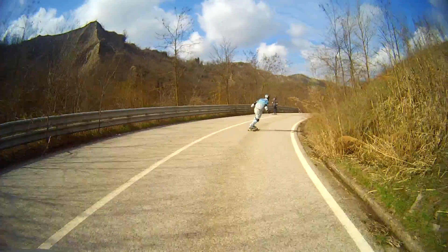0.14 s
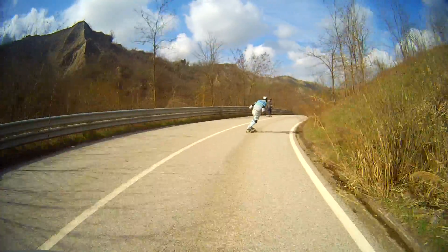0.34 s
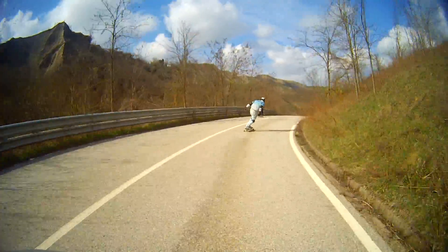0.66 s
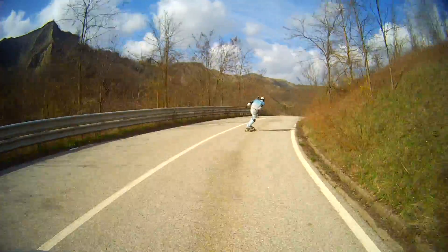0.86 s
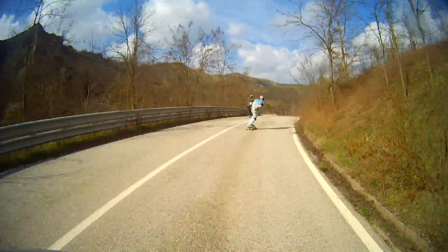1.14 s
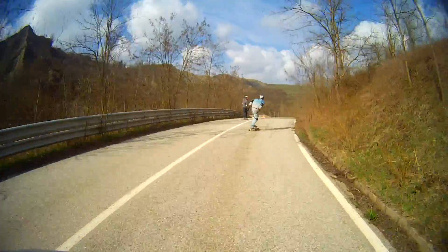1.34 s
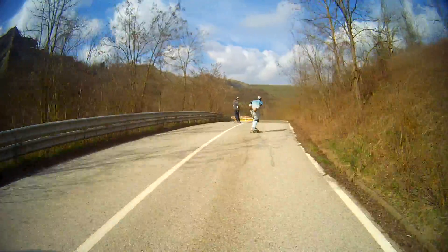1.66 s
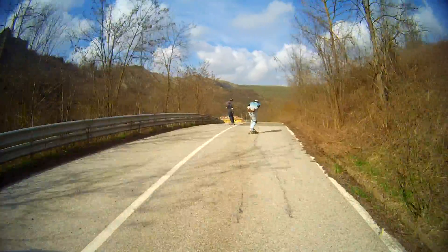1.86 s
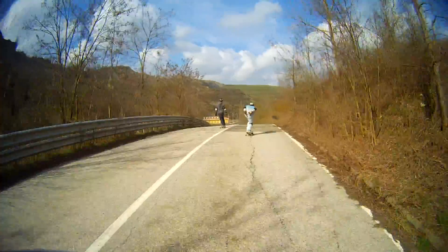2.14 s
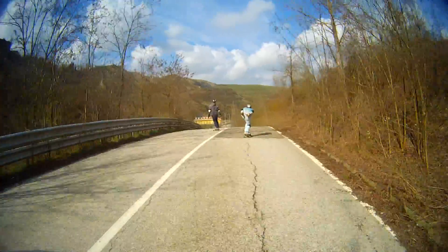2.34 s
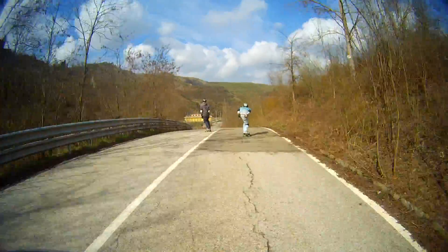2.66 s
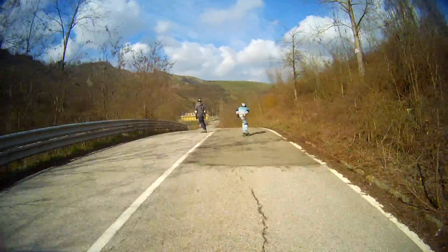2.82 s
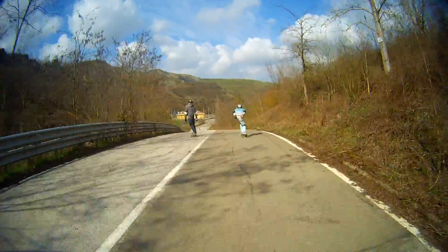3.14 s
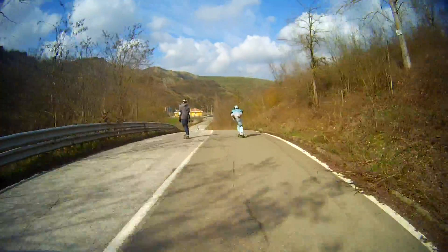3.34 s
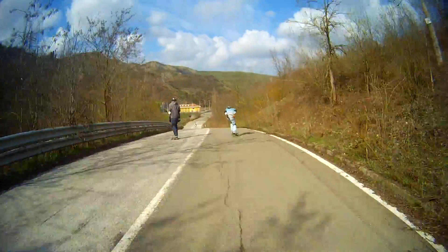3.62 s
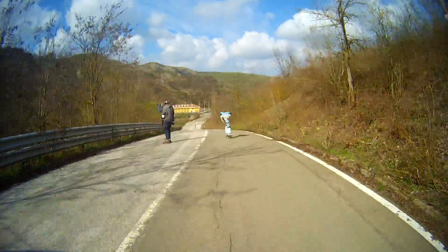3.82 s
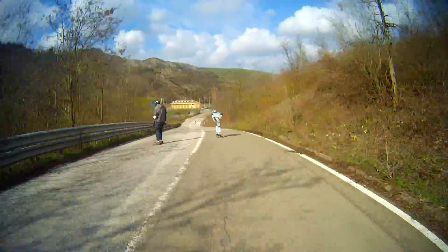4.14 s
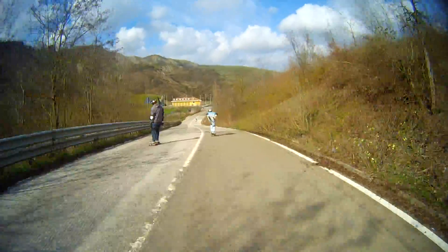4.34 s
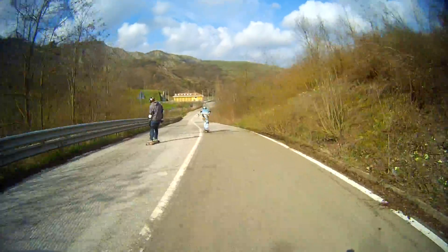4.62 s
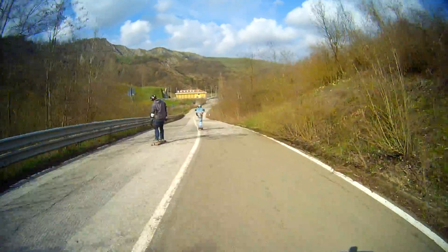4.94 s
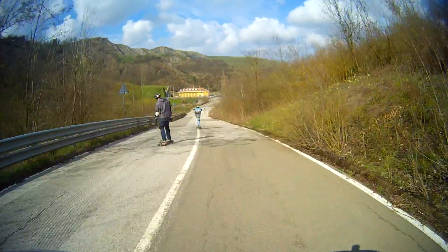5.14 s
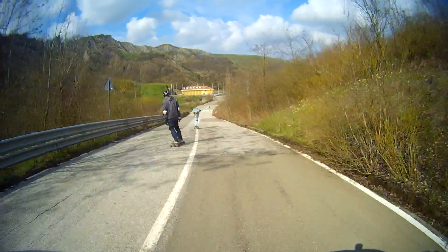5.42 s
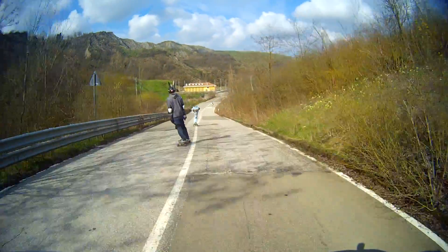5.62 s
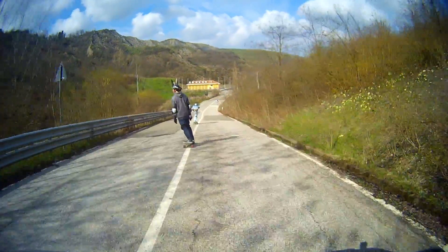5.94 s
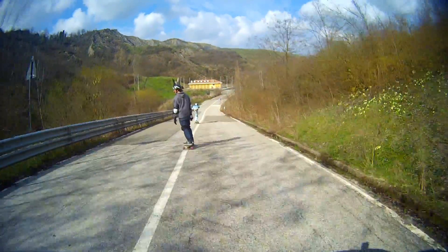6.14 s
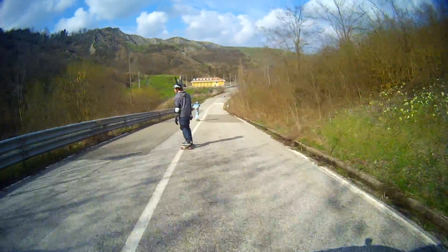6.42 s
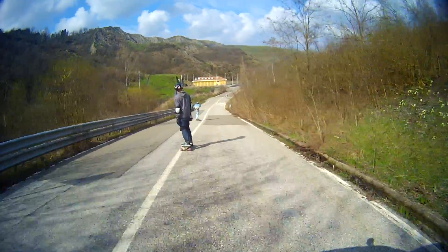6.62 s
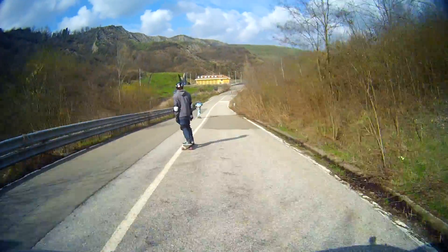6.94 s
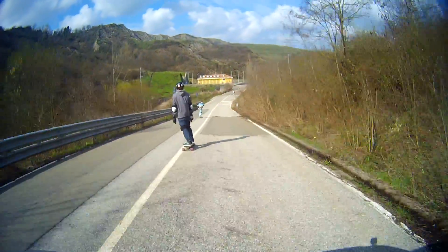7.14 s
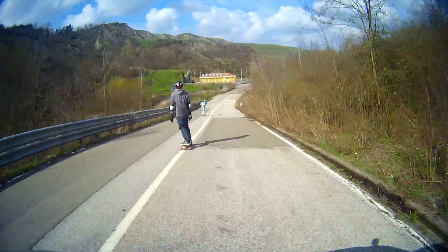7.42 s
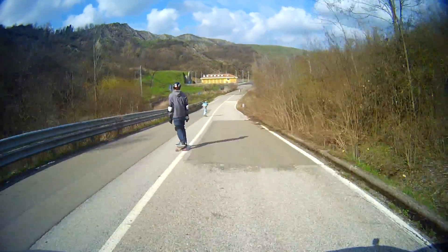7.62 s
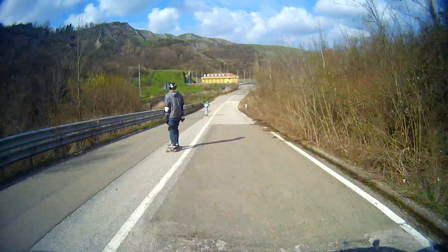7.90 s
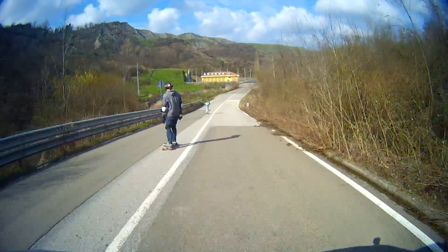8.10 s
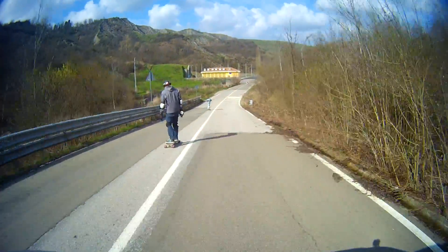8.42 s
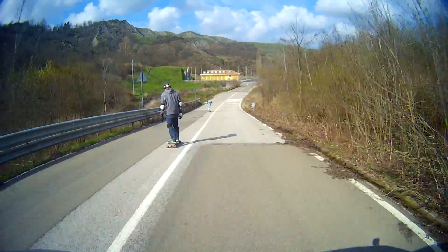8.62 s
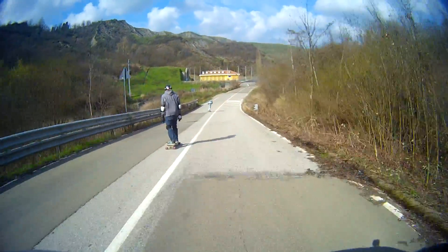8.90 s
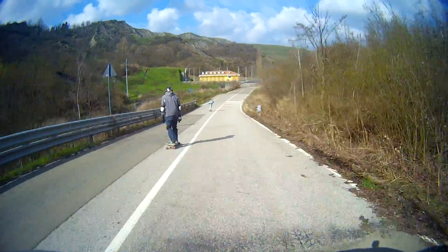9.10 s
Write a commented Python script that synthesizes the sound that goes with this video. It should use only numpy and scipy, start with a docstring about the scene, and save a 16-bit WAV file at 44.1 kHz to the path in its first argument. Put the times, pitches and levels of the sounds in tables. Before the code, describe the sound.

From a car following two longboarders downhill: deep tyre boom, coarse wheel roar, gusty airstream hiss, dull bumps and one small stone clack.

```python
"""A camera on a car follows two longboarders down a mountain road of patched asphalt.
Throughout, road-shaken body and tyres (noise-driven modes, drifting sines) boom under roaring wheels (noise).
From the start the airstream (bursty shaped noise) flutters in the camera's housing, strongest before 2.3 s;
gusts spit treble until 4.4 s. Bumps (damped sines) come from 0.5 s to 3.5 s and from 6.3 s to 8.6 s.
Grit ticks at 1.0 s and 2.1 s; a stone clacks at 2.4 s (noise cracks, short rings)."""
import sys
import numpy as np
from scipy.fft import rfft, irfft, next_fast_len
from scipy.io import wavfile
from scipy.ndimage import uniform_filter1d, map_coordinates

SR = 44100
rng = np.random.default_rng(int(sys.argv[2]) if len(sys.argv) > 2 else 0)


def materialize(psi):
    """Save the field psi as 16-bit PCM at rate SR to the path in sys.argv[1].

    A 1-D psi becomes a single channel; in a 2-D psi each row is a channel.
    """
    bounded = np.clip(np.atleast_2d(psi).T, -1, 1)
    quanta = np.round(bounded * 32767).astype(np.int16)
    wavfile.write(sys.argv[1], SR, quanta)


N = 408366


def amp(db):
    """Amplitude ratio from dB."""
    return 10 ** (np.asarray(db) / 20)


def unit(x):
    """x scaled to rms 1."""
    return x / np.sqrt(np.mean(x ** 2) + 1e-20)


def along(points, hz):
    """(f/Hz, value) points interpolated on a log frequency axis."""
    f, v = np.transpose(points)
    return np.interp(np.log(hz + 1), np.log(f + 1), v)


def curves(rows):
    """One value per sample for each column after the time."""
    s, *cols = np.transpose(rows)
    return [np.interp(np.arange(N) / SR, s, c) for c in cols]


def wobble(rate_hz):
    """A smooth random curve, rate_hz knots a second."""
    knots = rng.standard_normal(int(N * rate_hz / SR) + 4)
    return map_coordinates(knots, [np.arange(N) * rate_hz / SR])


def swells(rows):
    """A curve in dB with one smooth rise and fall for each row."""
    t = np.arange(N) / SR
    return sum(db * np.cos(np.pi * np.clip((t - s) / length_s, -.5, .5)) ** 2 for s, length_s, db in rows)


def follow(control_db, law):
    """Layer level in dB driven by a control; law: mean offset/dB, slope/(dB per dB)."""
    offset_db, slope = law
    mean_db = control_db.mean()
    return mean_db + offset_db + slope * (control_db - mean_db)


def filtered(x, response):
    """x times a complex response of frequency."""
    m = next_fast_len(N + SR // 2)
    return irfft(rfft(x, m) * response(np.fft.rfftfreq(m, 1 / SR)), m)[..., :N]


def resonance(f, hz, width_hz):
    """A causal resonance with gain 1 at its centre."""
    return 1j * f * width_hz / (hz * hz - f * f + 1j * f * width_hz)


def shaken(modes):
    """Steep-sided modes driven by a random force, rms 1."""
    def gain(f):
        power = sum(amp(db) ** 2 * abs(resonance(f, hz, 2 * half_width_hz)) ** 8
                    for hz, half_width_hz, db in modes)
        return np.sqrt(power)
    return unit(filtered(rng.standard_normal(N), gain))


def wavering(tones, sway_db):
    """Separate hums, each drifting in pitch and loudness on its own, rms 1."""
    total = np.zeros(N)
    for hz, drift_hz, db in tones:
        level = amp(db + sway_db * wobble(11))
        phase = 2 * np.pi * np.cumsum(hz + drift_hz * wobble(24)) / SR
        total += level * np.sin(phase)
    return unit(total)


def steady(x, span_s):
    """The same vibration with its swells longer than span_s evened out, rms 1."""
    power = np.abs(uniform_filter1d(x * x, max(int(span_s * SR), 1)))
    smooth_power = np.abs(uniform_filter1d(power, SR // 25))
    return unit(x / np.sqrt(smooth_power + 1e-3))


# road shaking the tyres: t/s, control/dB
SHAKE = [(0.0, -38), (0.41, -40.5), (0.55, -38), (0.8, -40.5), (1.3, -41), (2.45, -41), (2.56, -48),
         (2.63, -38.5), (2.78, -48.5), (2.9, -43), (3.44, -43.5), (3.55, -47), (3.7, -44), (4.0, -51.5),
         (4.2, -49), (4.43, -55), (4.55, -48.5), (5.21, -42.5), (5.58, -50.5), (5.8, -43), (6.2, -44.5),
         (6.36, -41), (7.2, -39.5), (8.3, -41), (8.39, -36), (8.51, -46), (8.6, -43), (9.26, -46.5)]
# tyre modes: f/Hz, half-width/Hz, relative level/dB
TYRE = [(88.8, 11.6, -2.5), (101.2, 9, 1), (118.9, 24, 0), (127, 19, -12.5), (150, 20.7, -10),
        (188, 30, -28.5)]
# tyre hums: f/Hz, drift scale/Hz, relative level/dB
HUM = [(158.9, 4.97, 1), (177, 3.02, -1), (192.8, 2.9, -4)]
# laws on the shaking: mean offset/dB, slope/(dB per dB)
RUMBLE_LAW = (-0.068, 0.96)
HUM_LAW = (-14, 0.55)


def tyres():
    """Road shaking drives the tyres' noise-excited modes and drifting hums."""
    shake_db, = curves(SHAKE)
    rumble = amp(follow(shake_db, RUMBLE_LAW)) * steady(shaken(TYRE), span_s=0.17)
    hum = amp(follow(shake_db, HUM_LAW)) * wavering(HUM, sway_db=4.0)
    return rumble + hum


# car body boom: t/s, control/dB, pitch f/Hz
HEAVE = [(0.0, -43, 50), (0.2, -39.5, 55), (0.54, -52, 55), (0.85, -40.5, 55.6), (1.08, -48.5, 55.8),
         (1.3, -45, 56), (1.75, -42.5, 55.9), (1.88, -48.5, 54), (2.03, -37.5, 53.5), (2.18, -47, 55.5),
         (2.42, -42.5, 56.5), (2.62, -55, 53), (2.95, -45, 52), (3.35, -47, 55.5), (3.52, -41.5, 56.5),
         (3.63, -46.5, 55.5), (3.75, -41, 55), (4.05, -51, 55.5), (4.56, -54.5, 56), (4.95, -52.5, 51),
         (5.12, -43, 55.5), (5.38, -47, 56), (5.55, -55, 52), (5.9, -49, 56), (6.45, -46.5, 55),
         (6.78, -48.5, 52), (6.9, -42.5, 52), (7.03, -46, 52), (7.16, -40, 52), (7.75, -49, 55),
         (7.92, -44, 55), (8.2, -50, 52), (8.35, -43.5, 55.5), (8.48, -47, 55.4), (8.64, -37.5, 55.4),
         (9.0, -47.5, 55.55), (9.26, -50, 50)]
# looser body modes: f/Hz, half-width/Hz, relative level/dB
BODY = [(30, 14, -17), (44.6, 9.5, -1), (55.9, 8.1, 1.5)]
# law on the heaving: mean offset/dB, slope/(dB per dB)
BOOM_LAW = (-0.14, 1)


def boom(drift_hz, sway_db):
    """Waves in the road boom the car's body on one narrow note, over looser modes."""
    heave_db, hz = curves(HEAVE)
    note = np.sin(2 * np.pi * np.cumsum(hz + drift_hz * wobble(14)) / SR)
    body = unit(unit(note) + amp(sway_db) * shaken(BODY))
    return amp(follow(heave_db, BOOM_LAW)) * steady(body, span_s=0.25)


# bumps in the road: t/s, level/dB, bounce f/Hz
BUMPS = [(0.515, -29, 105), (0.836, -29.5, 95.5), (1.998, -30, 104), (2.895, -29.5, 108),
         (3.455, -23, 113.7), (6.33, -25, 113.8), (6.686, -26, 112.5), (7.661, -26, 105), (8.372, -24, 93),
         (8.62, -25, 103.3)]


def bumps(t60_s, attack_s):
    """Each bump sets the tyres bouncing: a damped sine with a soft attack."""
    out, t = np.zeros(N + SR), np.arange(SR // 2) / SR
    envelope = amp(-60 * t / t60_s) * (1 - np.exp(-t / attack_s)) ** 2
    for s, db, hz in BUMPS:
        out[round(s * SR):][:len(t)] -= amp(db) * envelope * np.sin(2 * np.pi * hz * t)
    return out[:N]


# air ring inside the tyres: t/s, control/dB
RING = [(0.0, -49.5), (0.15, -49), (0.7, -55), (1.4, -54.5), (2.05, -53), (2.6, -62), (2.9, -57.5),
        (3.12, -65.5), (3.38, -57.5), (3.58, -68.5), (4.0, -64.5), (4.45, -72), (4.9, -64.5), (6.2, -61),
        (7.45, -58), (8.6, -66), (9.0, -61.5), (9.26, -63.5)]
# cavity notes: f/Hz, drift scale/Hz, relative level/dB
CAVITY = [(226.6, 6.13, -10), (245.4, 2.78, -2), (261.4, 3.31, -6)]
# loose murmur: f/Hz, half-width/Hz, relative level/dB
MURMUR = [(163, 30, 4), (190, 28, -2), (224, 29, 0.5)]
# law on the ring control: mean offset/dB, slope/(dB per dB)
RING_LAW = (-0.8, 1.03)


def tyre_cavity(murmur_db):
    """Air inside the tyres rings on drifting notes over a loose noise-driven murmur."""
    ring_db, = curves(RING)
    cavity = wavering(CAVITY, sway_db=3.5) + amp(murmur_db) * shaken(MURMUR)
    return amp(follow(ring_db, RING_LAW)) * cavity


# panel drone: t/s, level/dB before a 0.1 dB trim
DRONE = [(0.0, -54), (0.7, -56), (1.25, -59.5), (3.35, -62), (3.6, -63), (4.5, -62.5), (5.3, -61.5),
         (6.9, -60.5), (9.26, -60)]
# panel modes: f/Hz, half-width/Hz, relative level/dB
PANELS = [(258, 55, -7), (304.5, 29, -2.5), (317, 17.5, -1), (356.5, 22, -1), (387, 21, 0), (413, 21, -3.5)]
# panel notes: f/Hz, drift scale/Hz, relative level/dB
PANEL_NOTES = [(315.5, 3.48, -1), (357, 1.65, 0), (384.3, 3.6, -2)]


def panel_drone(notes_db):
    """Road-driven panels drone in broad modes and narrow drifting notes."""
    drone_db, = curves(DRONE)
    panels = unit(shaken(PANELS) + amp(notes_db) * wavering(PANEL_NOTES, sway_db=4.0))
    return amp(drone_db - 0.1) * steady(panels, span_s=0.21)


# asphalt coarseness: t/s, control/dB
COARSE = [(0.0, -50), (1.15, -50), (2.55, -53.5), (3.33, -52.5), (3.7, -56), (4.4, -56), (5.05, -57.5),
          (5.24, -53.5), (5.8, -54.5), (6.05, -52), (9.24, -52.5)]
# tread modes: f/Hz, half-width/Hz, relative level/dB
TREAD = [(451, 42, -6.5), (488, 34, 0), (528, 44, 0), (569, 38, -0.5), (601, 24.5, -1), (627, 25, -6.5),
         (660, 40, -15), (706, 26, -12), (790, 37, -17.5)]
# tread notes: f/Hz, drift scale/Hz, relative level/dB
TREAD_NOTES = [(492.6, 5.98, -4), (574, 7, -3), (596.7, 6.025, 0)]
# law on the coarseness: mean offset/dB, slope/(dB per dB)
TREAD_LAW = (-5, 1)


def tread_roar(notes_db):
    """Coarse asphalt drives the tread's broad modes and narrow drifting notes."""
    coarse_db, = curves(COARSE)
    blocks = unit(shaken(TREAD) + amp(notes_db) * wavering(TREAD_NOTES, sway_db=4.5))
    level_db = follow(coarse_db, TREAD_LAW) + 0.64 * wobble(11)
    return amp(level_db) * steady(blocks, span_s=0.16)


# airstream strength: t/s, control/dB
AIR = [(0.0, -50), (0.08, -51.5), (0.13, -49), (0.23, -53.5), (0.34, -48.3), (0.46, -53), (0.57, -49.5),
       (0.66, -53.5), (0.73, -50.3), (0.81, -53.5), (0.89, -47.5), (0.95, -46), (1.0, -48.3), (1.1, -48.7),
       (1.17, -47), (1.25, -48.5), (1.33, -52.7), (1.38, -53.5), (1.42, -50.5), (1.5, -52.3), (1.64, -52),
       (1.72, -49.7), (1.83, -49.3), (1.93, -51.3), (2.05, -50.2), (2.16, -50.3), (2.3, -53), (2.39, -55),
       (2.45, -52.5), (2.5, -56.3), (2.6, -59), (2.68, -53.5), (2.88, -54.5), (2.93, -57.5), (3.13, -58),
       (3.18, -53.7), (3.3, -56.5), (3.43, -53.5), (3.7, -57.3), (3.96, -60.5), (4.02, -56), (4.14, -54.7),
       (4.2, -52.5), (4.29, -52.3), (4.42, -55.5), (4.56, -54.8), (4.8, -56.3), (4.95, -55), (5.25, -56.5),
       (5.4, -54.7), (5.85, -55.7), (6.0, -53.7), (6.3, -56), (6.5, -54.5), (6.73, -56.3), (6.82, -52),
       (6.93, -53.2), (7.06, -57.3), (7.3, -55.7), (7.52, -52.7), (7.68, -54.5), (8.1, -53.7),
       (8.38, -53.4), (8.52, -57.3), (8.69, -53.5), (8.85, -56.5), (9.05, -53.5), (9.26, -56)]
TURBULENCE_DB, TURBULENCE_GROWTH = 0.3, 0.071  # sway at mean strength; exponent per dB


def airflow():
    """The airstream's control in dB: the stronger it is the more it sways."""
    air_db, = curves(AIR)
    sway_db = TURBULENCE_DB * np.exp(TURBULENCE_GROWTH * (air_db - air_db.mean()))
    return air_db + sway_db * wobble(22)


# rush spectrum: f/Hz, relative density/(dB per Hz)
RUSH = [(300, -13), (700, -6), (1300, -11.5), (1600, -3.5), (2750, -2.5), (3350, -4.5), (3900, -2.5),
        (4500, -6), (5700, -9.5), (6600, -8), (7500, -16.5), (9200, -23.5), (11000, -42), (15000, -38)]
# housing cavities: f/Hz, width/Hz, boost/dB
HOUSING = [(1050, 58, 2.7), (1194, 68, 7.9), (1437, 110, 5.5), (1758, 340, 5.6), (2290, 250, 2.1),
           (2640, 66, 1.8), (3106, 90, 5.5), (3660, 90, 5.2), (4280, 135, 4.7), (5110, 565, 13.1),
           (6170, 99, 6.2), (10100, 280, 4.4)]
# law on the airstream: mean offset/dB, slope/(dB per dB)
RUSH_LAW = (-0.6, 0.95)


def airstream(air_db, flutter_db, grain_db):
    """Eddies break on the camera in quick bursts and sound the cavities of its housing."""
    white = rng.standard_normal(N)
    eddies = unit(white * amp(flutter_db * wobble(55) + grain_db * wobble(600)))

    def colour(f):
        cavities_db = sum(db * abs(resonance(f, hz, width_hz)) ** 2 for hz, width_hz, db in HOUSING)
        return amp(along(RUSH, f) + cavities_db)
    return amp(follow(air_db, RUSH_LAW)) * unit(filtered(eddies, colour))


# treble gusts: middle t/s, length/s, rise/dB
GUSTS = [(0.31, 0.15, 1), (0.57, 0.13, 5), (0.733, 0.087, 6), (0.892, 0.039, 12), (0.947, 0.072, 7),
         (1.173, 0.084, 5), (1.245, 0.083, 8), (1.774, 0.23, 3.5), (2.078, 0.031, 9), (2.13, 0.061, 7.5),
         (2.342, 0.049, 8), (3.193, 0.08, 7.5), (4.24, 0.3, 8)]
# law on the airstream: mean offset/dB, slope/(dB per dB)
SIZZLE_LAW = (-24, 0.14)


def sizzle(air_db, sway_db, spurt_db):
    """The sharpest eddies spit short spurts of treble, most of all in gusts."""
    spurt_level_db = sway_db * wobble(6.8) + spurt_db * np.tanh(wobble(60)) + 4.0 * wobble(350)
    spurts = unit(rng.standard_normal(N) * amp(spurt_level_db))

    def colour(f):
        return abs(resonance(f, 9740, 730)) ** 2 + 0.59 * abs(resonance(f, 7900, 3500)) ** 4
    level_db = follow(air_db, SIZZLE_LAW) + swells(GUSTS)
    return amp(level_db) * unit(filtered(spurts, colour))


# slit modes: f/Hz, half-width/Hz, relative level/dB
SLIT = [(4840, 190, -2.5), (4980, 230, -1), (5310, 150, -2.5)]
# law on the airstream: mean offset/dB, slope/(dB per dB)
WHISTLE_LAW = (-9.5, 1.56)


def whistle(air_db, flutter_db):
    """Air over a slit in the housing gives a hoarse whistle that grows faster than the rush."""
    hoarse = unit(shaken(SLIT) * amp(flutter_db * wobble(45)))
    return amp(follow(air_db, WHISTLE_LAW)) * hoarse


# wheels rolling: t/s, control/dB
ROLL = [(0.0, -65.5), (0.85, -65.5), (0.9, -60), (0.93, -63.5), (1.7, -67.5), (1.75, -65), (2.4, -66.5),
        (2.45, -64), (2.5, -69), (2.71, -65), (3.14, -71), (3.17, -67), (3.84, -68.5), (3.87, -70),
        (4.26, -67), (5.16, -70.5), (5.42, -67), (7.3, -70), (7.53, -64), (7.76, -69), (8.07, -66.5),
        (9.26, -69)]
# roar spectrum: f/Hz, relative density/(dB per Hz)
ROAR = [(20, 5), (100, 10), (300, 0.5), (700, 4.5), (850, 0.5), (1000, -3), (1400, -3.5), (2500, -1.5),
        (5000, -12), (12000, -61)]
# law on the rolling: mean offset/dB, slope/(dB per dB)
ROAR_LAW = (6.25, 1.34)


def wheels(grain_db, spread):
    """Wheels chatter over the stones of the asphalt: a wide, finely grained roar."""
    roll_db, = curves(ROLL)
    mid, side = rng.standard_normal((2, N)) * amp(grain_db * wobble(400))
    pair = np.array([mid + spread * side, mid - spread * side])
    roar = filtered(pair, lambda f: amp(along(ROAR, f)))
    return amp(follow(roll_db, ROAR_LAW)) * unit(roar)


# stone contacts: t/s, level/dB
STONE = [(2.4363, -35), (2.4393, -44), (2.4435, -56), (2.4575, -55)]
# stone ring modes: f/Hz, relative level/dB, t60/s
CLACK = [(1480, -7, 0.033), (1850, -1, .02), (2350, -9, 0.01), (3520, -13, 0.011), (5040, -13, .025)]


def stone(crack_db, crack_t60_s, attack_s):
    """A stone clacks on the car and skitters off: each contact is a crack and a few quickly dying modes."""
    out, t = np.zeros(N + SR), np.arange(SR // 10) / SR
    attack = 1 - np.exp(-t / attack_s)
    for s, db in STONE:
        ring = np.zeros(len(t))
        for hz, mode_db, t60_s in CLACK:
            ring += amp(mode_db + rng.normal(0, 1) - 60 * t / t60_s) * np.sin(2 * np.pi * hz * t)
        crack = amp(crack_db - 60 * t / crack_t60_s) * rng.standard_normal(len(t))
        out[round(s * SR):][:len(t)] += amp(db) * attack * (ring + crack)
    return out[:N]


# grit strikes: t/s, level/dB, f/Hz, crack filter width per pass/Hz, t60/s, crack share/0-1
GRIT = [(1.022, -49, 9300, 5500, .05, 0.9), (2.052, -39.5, 2780, 1400, 0.037, 0.85)]


def grit():
    """A grain of grit gives a compact knock in one band and a very short ring."""
    out, t = np.zeros(N + SR), np.arange(SR // 10) / SR
    attack = 1 - np.exp(-t / 0.0032)
    for s, db, hz, width_hz, t60_s, share in GRIT:
        band = filtered(rng.standard_normal(N), lambda f: resonance(f, hz, width_hz) ** 2)
        crack = unit(band)[:len(t)]
        ring = np.sin(2 * np.pi * hz * t)
        envelope = attack * amp(db - 60 * t / t60_s)
        out[round(s * SR):][:len(t)] += envelope * (share * crack + (1 - share) * ring)
    return out[:N]


# buffeting spectrum: f/Hz, relative density/(dB per Hz)
BUFFET = [(3, -16), (12, -4), (25, -4), (45, 1), (80, -38), (200, -37), (600, -80)]


def buffet(level_db):
    """A faint, very deep buffeting, independent noise at each port."""
    return amp(level_db) * unit(filtered(rng.standard_normal((2, N)), lambda f: amp(along(BUFFET, f))))


# port level difference: f/Hz, left minus right/dB
TILT = [(50, -3.5), (115, -3), (200, -0.5), (260, 2), (350, 5), (490, 8), (600, 8.5), (800, 6.5), (1500, 6),
        (6000, 5.5), (10000, 2.5)]
# port phase difference: f/Hz, left lead/rad
LEAD = [(20, .15), (60, 0.49), (120, 0.57), (240, 0.91), (340, 0.89), (500, 0.6), (750, 0.3), (1500, 0.086)]


def ports(x):
    """The housing colours and delays the sound differently at each microphone port."""
    def response(f):
        half = amp(along(TILT, f) / 2) * np.exp(.5j * along(LEAD, f))
        pair = np.array([half, 1 / half])
        return pair / np.abs(pair.mean(axis=0))  # mean of both ports has gain 1
    return filtered(x, response)


def scene():
    """Car, airstream and wheels reach the camera through its two ports; buffeting adds to each."""
    car = tyres() + tyre_cavity(murmur_db=-2.5) + panel_drone(notes_db=-3.5) + tread_roar(notes_db=-4.5)
    car = car + boom(drift_hz=0.69, sway_db=-3) + bumps(t60_s=0.16, attack_s=0.0084)
    air_db = airflow()
    air = airstream(air_db, flutter_db=1.15, grain_db=0.84) + sizzle(air_db, sway_db=1.5, spurt_db=4.5)
    air = air + whistle(air_db, flutter_db=2.7)
    strikes = stone(crack_db=-16, crack_t60_s=0.0054, attack_s=0.0005) + grit()
    return ports(car + air + strikes + wheels(grain_db=0.5, spread=0.46)) + buffet(level_db=-53)


# hiss spectrum: f/Hz, relative density/(dB per Hz)
HISS = [(100, -12), (3000, -5.5), (8000, -1), (11000, -1.5), (15000, -7)]
# constant offset, one row per channel: offset/full scale
OFFSET = [
    [.0338],
    [-.0199],
]
TOP_HZ = 15100


def record(dry):
    """The camera adds faint hiss and a constant offset, and keeps nothing above its band limit."""
    hiss = unit(filtered(rng.standard_normal((2, N)), lambda f: amp(along(HISS, f))))
    hissy = dry + amp([[-72], [-70]]) * hiss
    return filtered(hissy, lambda f: f < TOP_HZ) + np.array(OFFSET)


dry = scene()
out = record(dry)
materialize(out)
```